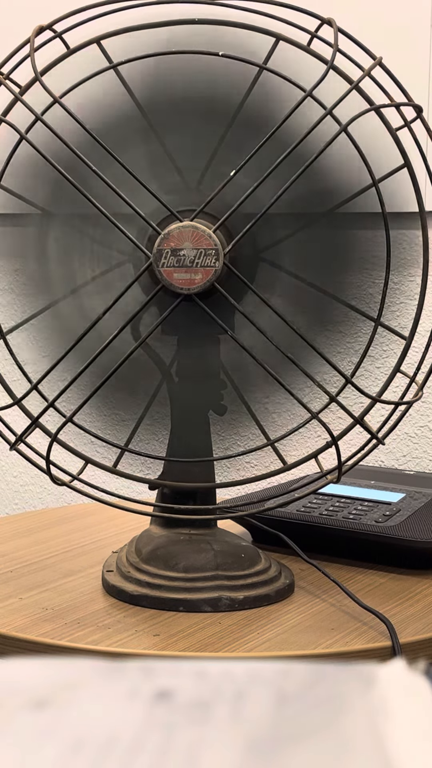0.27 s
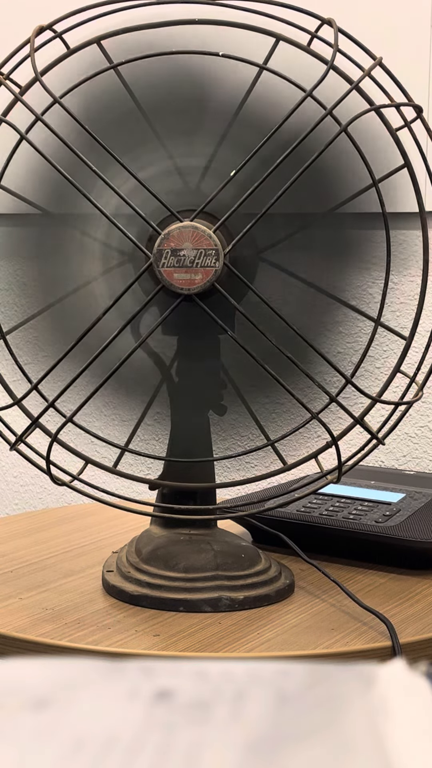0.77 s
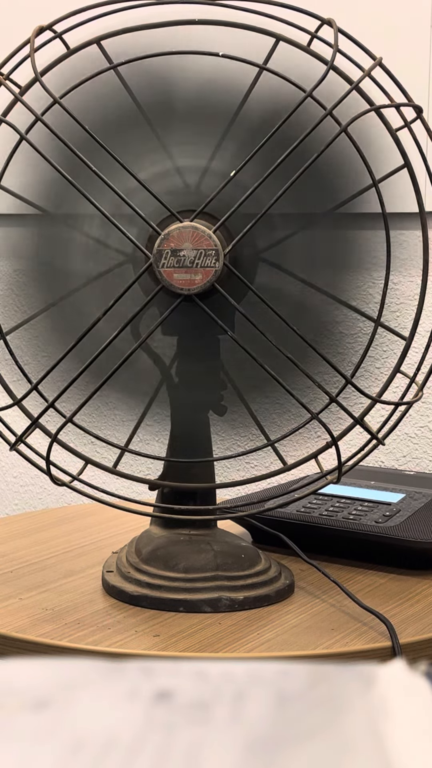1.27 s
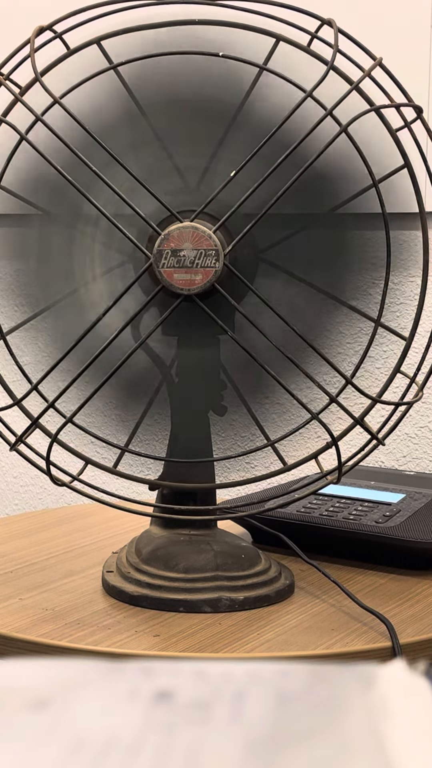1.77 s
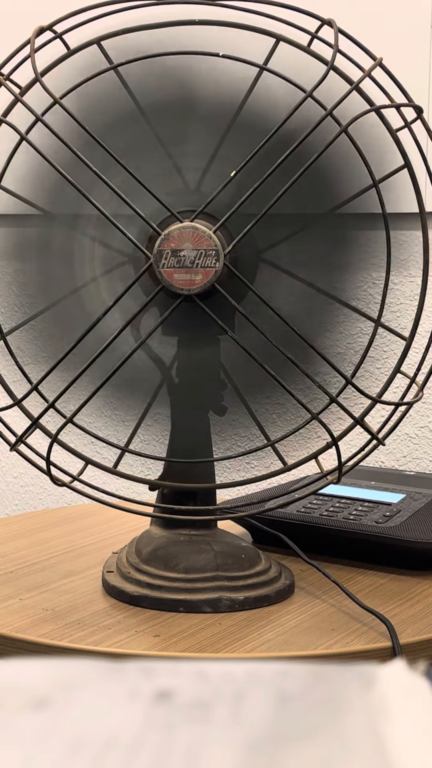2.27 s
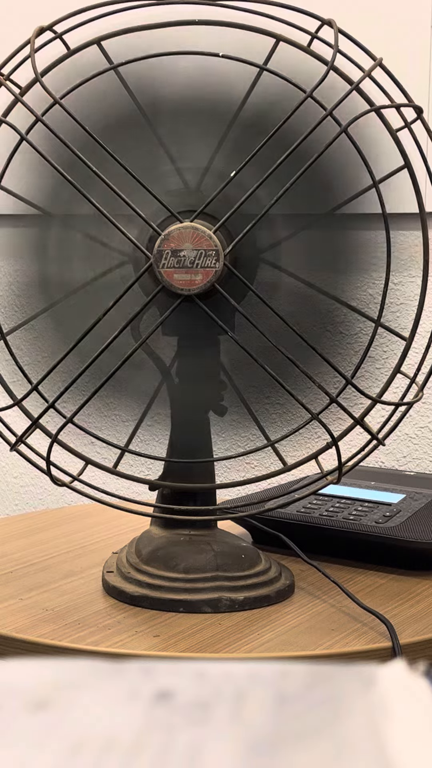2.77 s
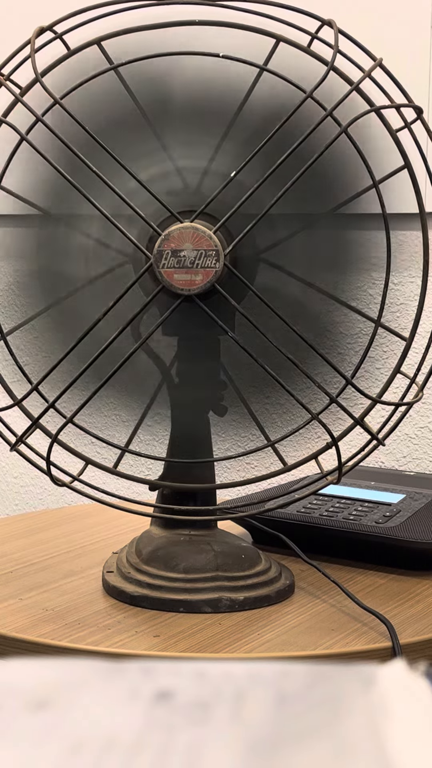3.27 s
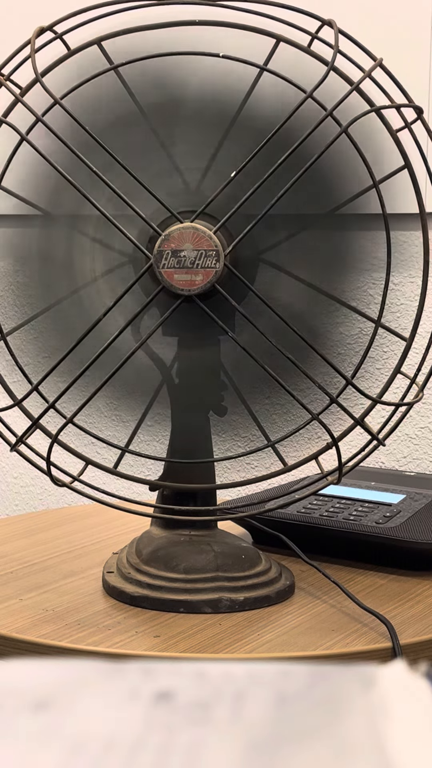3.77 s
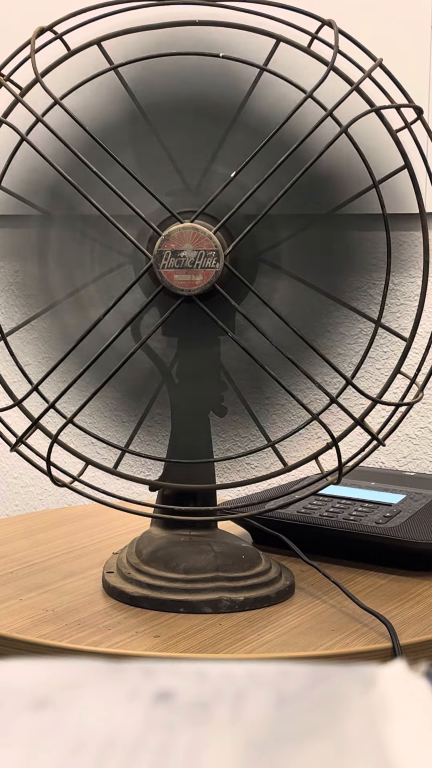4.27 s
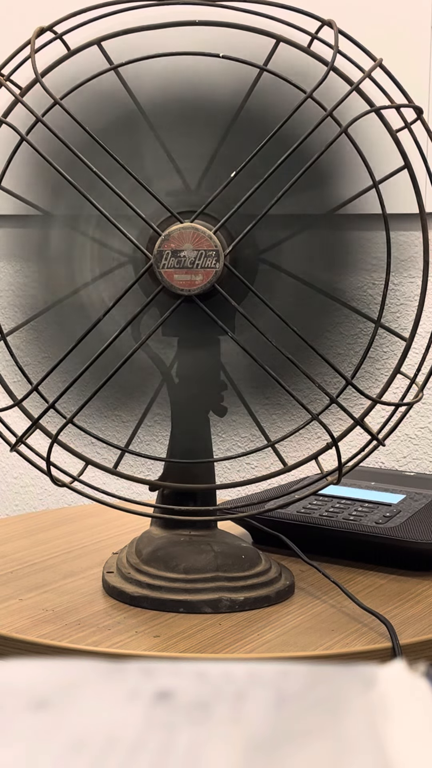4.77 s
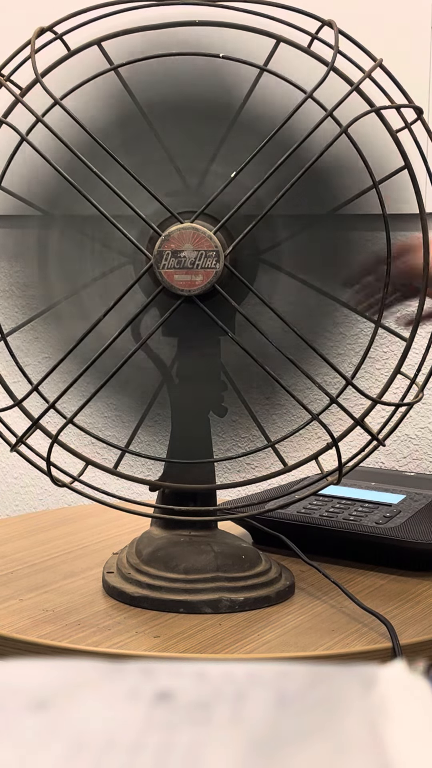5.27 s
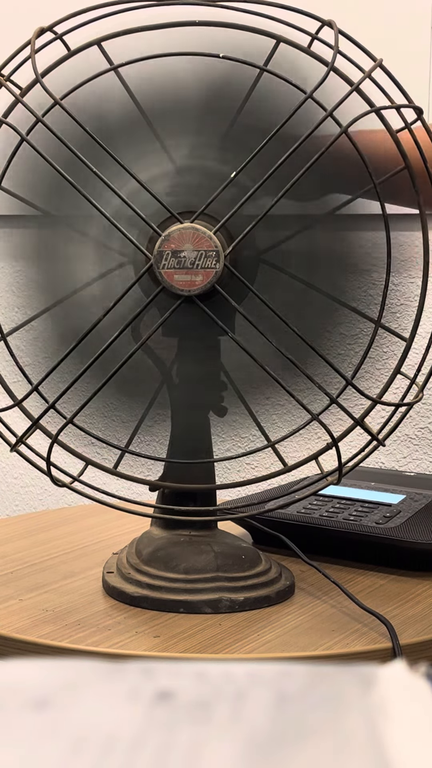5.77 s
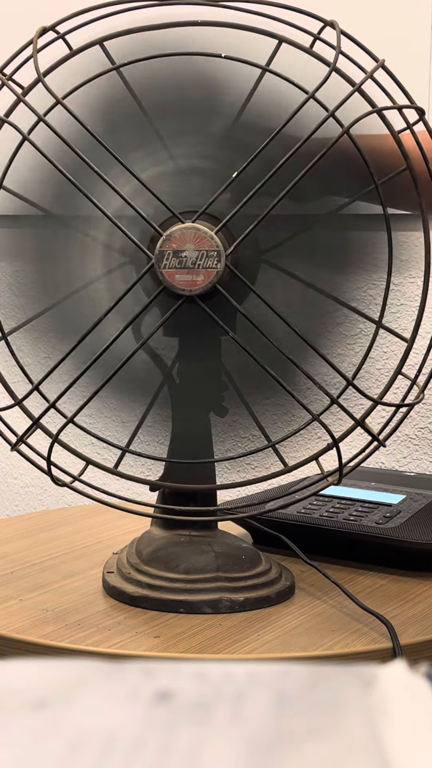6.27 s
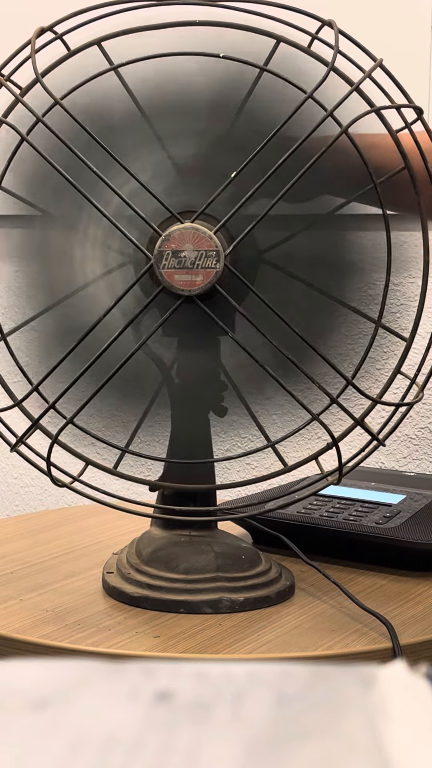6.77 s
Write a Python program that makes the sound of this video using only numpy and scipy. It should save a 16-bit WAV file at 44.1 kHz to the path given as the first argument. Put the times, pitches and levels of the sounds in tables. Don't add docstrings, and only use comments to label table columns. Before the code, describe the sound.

Close desk fan blowing straight into a microphone: gusty wind rumble, deep thuds, rapid flutters, even blade hiss, one tiny tick past the middle.

```python
import sys
import numpy as np
from scipy import signal
from scipy.fft import rfft, irfft, next_fast_len
from scipy.io import wavfile
from scipy.ndimage import uniform_filter1d

SR = 44100
rng = np.random.default_rng(int(sys.argv[2]) if len(sys.argv) > 2 else 0)


def wav_out(sig):
    wavfile.write(sys.argv[1], SR, np.round(np.clip(np.atleast_2d(sig).T, -1, 1) * 32767).astype(np.int16))


def field_ratio(decibels):
    return 10 ** (np.asarray(decibels, dtype=float) / 20)


N = 309582
TIME_S = np.arange(N) / SR
SIZE = next_fast_len(N)
HZ = np.maximum(np.arange(SIZE // 2 + 1) * SR / SIZE, 1)


def in_time(rows):
    s, *columns = np.transpose(rows)
    return [np.interp(TIME_S, s, c) for c in columns]


def at_hz(points, hz):
    point_hz, level_db = np.array(points).T
    return np.interp(np.log(hz), np.log(point_hz), level_db)


def rms_one(x):
    return x / np.sqrt(np.mean(x ** 2) + 1e-20)


def drift(rate_hz):
    r = np.exp(-20 * np.pi * rate_hz / SR)
    slow = signal.lfilter([1], [1, -2 * r, r * r], rng.standard_normal(N // 10 + 4002))[4000:]
    return np.interp(np.arange(N) / 10, np.arange(len(slow)), rms_one(slow))


def coloured(spectrum, excite=1):
    low_end = (spectrum[0][0] / 2, -80)
    high_end = (spectrum[-1][0] * 1.5, -90)
    gain = field_ratio(at_hz([low_end] + list(spectrum) + [high_end], HZ))
    white = excite * rng.standard_normal((2, N))
    return rms_one(irfft(rfft(white, SIZE) * gain, SIZE)[:, :N])


def evened(x, window_s, share):
    size = int(window_s * SR)
    power = uniform_filter1d(uniform_filter1d(x ** 2, size=size), size=size)
    return rms_one(x / (power + .02) ** (share / 2))


def puffs(rows, octaves, smooth=0.87):
    start_s, peak_db, pitch_hz, width_ms = np.transpose(rows)
    span = 3072
    half = span // 2
    t = (np.arange(span) - half) / SR
    f = np.maximum(np.arange(half + 1) * SR / span, 1)

    length_s = np.clip(width_ms[:, None, None] / 500, .002, .065)
    swell = np.cos(np.pi * np.clip(t / length_s, -.5, .5)) ** 2
    reach = np.where(f < pitch_hz[:, None], 2.18 * octaves, octaves)
    colour = np.exp(-.5 * (np.log2(f / pitch_hz[:, None]) / reach) ** 2)

    raw = rfft(rng.standard_normal((len(start_s), 2, span)) * swell)
    filled = raw / (np.abs(raw) + .3) ** np.clip(smooth, 0, 1)
    shaped = irfft(filled * colour[:, None], span) * np.sqrt(swell)
    shaped *= field_ratio(peak_db)[:, None, None] / np.abs(shaped).max(axis=2, keepdims=True)

    out = np.zeros((2, N + span))
    for at, puff in zip((start_s * SR).astype(int), shaped):
        out[:, at:at + span] += puff
    return out[:, half:N + half]


# time_s, level_db
STREAM_LEVEL = [(0, -28), (.5, -31), (.8, -28), (1.1, -29.5), (1.55, -24.5), (2.0, -28), (2.35, -26.5),
                (2.75, -26), (3.35, -25), (3.7, -25), (4.0, -23), (4.4, -26.5), (5.05, -23.5), (5.4, -26),
                (5.8, -26), (6.25, -27), (6.6, -27), (7.02, -26)]
# centre_s, over_stream_db, half_width_ms
STREAM_SWINGS = [(.37, -6.5, 21), (.45, 5.5, 54), (.94, -12, 20), (1.17, -2, 30), (1.27, 4.5, 19),
                 (1.35, -11, 38), (1.43, 8, 21), (2.45, -5.5, 42), (2.54, 6, 21), (2.96, -7.5, 46),
                 (3.032, 6, 33), (3.14, -5, 33), (3.225, 10, 28), (3.7, -10, 27), (3.87, -12.5, 60),
                 (4.13, -6, 71), (4.18, 11, 7.5), (4.57, -14, 21), (4.63, 8.5, 12), (4.69, -8, 42),
                 (4.79, 1.5, 45), (4.89, -4, 33), (4.94, 7.5, 15), (5.201, -20.5, 17), (5.648, 9, 20),
                 (6.15, -15.5, 22), (6.35, -6, 20), (6.41, 6.5, 17), (6.671, -3, 8.3), (6.78, -6, 6.7),
                 (0.0, 9.5, 75), (.135, 5, 22), (.7, -5, 19), (.735, 2, 15), (1.8, 0, 16), (1.97, 7, 14),
                 (2.08, 3.5, 18), (2.22, -2, 47), (2.34, -5.5, 17), (2.47, 6.5, 15), (2.845, 3.5, 12),
                 (2.9, -2.5, 9), (3.32, -6.5, 42), (4.05, -4.5, 17), (4.13, -9, 20), (4.26, -8, 11),
                 (4.9, -1.5, 36), (5.35, -8, 14), (5.45, -2, 20), (5.6, 6, 20), (5.7, -1.5, 15),
                 (5.87, 6.5, 27), (5.98, -2, 19), (6.199, 9, 11), (6.27, 7, 20), (6.48, -4.5, 20),
                 (6.62, 3.5, 16), (6.71, -6.5, 14), (4.64, 2, 25), (1.5, 1, 23)]


def stream_levels():
    outset_db, outset_fade_s = -5.0, 0.087
    upper_follows, upper_lead_s = 0.33, 0.036
    stream_db = in_time(STREAM_LEVEL)[0] + outset_db * np.exp(-TIME_S / outset_fade_s)
    coarse_s = np.arange(0, N / SR, .002)
    centre_s, over_db, half_width_ms = np.transpose(STREAM_SWINGS)[:, :, None]
    swing_db = np.sum(over_db * np.exp(-.5 * ((coarse_s - centre_s) / half_width_ms * 1000) ** 2), axis=0)
    deep_db = stream_db + np.interp(TIME_S, coarse_s, swing_db)
    upper_db = stream_db + upper_follows * np.interp(TIME_S + upper_lead_s, coarse_s, swing_db)
    return deep_db, upper_db


# pitch_hz, density_db
DEEP_SPECTRUM = [(20, -41), (35, -15), (58, 1), (85, -3), (110, -9.5), (160, -35.5)]
# pitch_hz, density_db
UPPER_SPECTRUM = [(60, -26.5), (95, -3), (130, -2), (200, -9.5), (300, -12), (450, -25)]


def rumble(deep_db, upper_db):
    deep = evened(coloured(DEEP_SPECTRUM), window_s=0.13, share=1.0)
    upper = evened(coloured(UPPER_SPECTRUM), window_s=0.022, share=0.8)
    deep_gain = field_ratio(deep_db + 0.6 + 2.1 * drift(23))
    upper_gain = field_ratio(upper_db - 8 + 1.34 * drift(13.0))
    return deep_gain * deep + upper_gain * upper


# pitch_hz, density_db
FLUTTER_SPECTRUM = [(200, 1.5), (320, 4), (550, 3.5), (1000, -5), (1400, -19.5), (2200, -17)]


def flutter(upper_db):
    flutter_db, follows = -43.5, .4
    clumps = field_ratio(np.minimum(2.3 * drift(35) + 4.7 * drift(150), 6))
    return field_ratio(flutter_db + follows * (upper_db + 28.5)) * coloured(FLUTTER_SPECTRUM, clumps)


def buffeting():
    deep_db, upper_db = stream_levels()
    return rumble(deep_db, upper_db) + flutter(upper_db)


# start_s, peak_db, pitch_hz, width_ms
LARGE_EDDIES = [(0.7233, -17.5, 130, 6.5), (1.3921, -20, 142, 7.9), (1.6185, -17, 144, 6.7),
                (1.9109, -21.5, 117, 16), (2.4705, -11.5, 172, 4.9), (2.6838, -17, 128, 49),
                (3.0075, -14.5, 175, 24), (3.205, -13, 203, 21), (3.5907, -20, 121, 39),
                (3.7788, -14, 153, 16), (4.1838, -23, 129, 39), (4.2628, -17.5, 145, 32),
                (4.6305, -16.5, 150, 6), (4.7886, -6.5, 143, 7.9), (4.9214, -14.5, 124, 37),
                (4.981, -17, 151, 5.8), (5.0137, -20.5, 127, 19), (5.0951, -15.5, 131, 13),
                (5.2625, -15, 159, 14), (5.4019, -10, 177, 2.16), (5.5051, -23, 151, 7.6),
                (5.607, -10.5, 137, 19), (5.7638, -15.5, 148, 19), (5.8544, -23, 174, 10),
                (6.0724, -18, 182, 3.2), (6.1557, -18, 159, 17), (6.3017, -15, 120, 38),
                (6.3968, -16.5, 148, 34), (6.5421, -21, 132, 23), (6.7719, -16.5, 194, 22)]
# start_s, peak_db, pitch_hz
FURTHER_THUMPS = [(0.0898, -28.5, 140), (0.1833, -19, 140), (0.2481, -22.5, 150), (0.2934, -26.5, 150),
                  (0.4066, -21.5, 159), (0.5349, -16, 117), (0.8001, -25, 150), (0.86, -14.5, 130),
                  (1.0446, -23, 190), (1.4111, -28, 138), (1.4928, -23.5, 177), (1.5556, -26, 150),
                  (1.7006, -17.5, 170), (1.7858, -22.5, 182), (1.8171, -20.5, 150), (1.853, -19.0, 150),
                  (2.1146, -23.0, 170), (2.1396, -16, 159), (2.3548, -20, 190), (2.5225, -14, 140),
                  (2.5501, -22, 150), (2.5857, -17.5, 169), (2.7415, -28, 140), (2.7745, -26.5, 160),
                  (3.0772, -23.5, 142), (3.4485, -25, 150), (3.5242, -23.5, 130), (3.6728, -23.5, 170),
                  (3.7387, -17, 130), (3.7592, -19, 177), (3.9767, -22.5, 190), (4.0591, -15.5, 130),
                  (4.1174, -20.5, 204), (4.2794, -18, 140), (4.3045, -27, 128), (4.3244, -21, 140),
                  (4.3521, -21, 141), (4.4972, -18.5, 140), (4.5281, -18.5, 130), (4.7236, -24.5, 180),
                  (4.7443, -23, 130), (4.8127, -22.5, 164), (4.8809, -21, 150), (4.9076, -16.0, 160),
                  (5.0368, -20.0, 222), (5.2379, -19, 155), (5.3105, -20, 150), (5.6522, -27, 127),
                  (5.7098, -21, 220), (5.7931, -21, 201), (5.8318, -22, 150), (5.9482, -20, 150),
                  (6.0055, -15.5, 151), (6.0387, -28.5, 150), (6.1881, -24.5, 176), (6.3495, -27, 142),
                  (6.5662, -22.0, 150), (6.6019, -22.5, 190), (6.6649, -18, 177), (7.0066, -18.5, 148)]


def eddies():
    further_thump_ms = 11.1
    further_thumps = np.c_[FURTHER_THUMPS, np.full(len(FURTHER_THUMPS), further_thump_ms)]
    large = np.r_[LARGE_EDDIES, further_thumps]
    snaps = small_eddies()
    snap_octaves = np.clip(0.45 + 0.02 * (snaps[:, 1:2] + 25), .3, 1.2)
    pushes = snaps * [1, 0.78, 0.46, 1.9]
    thump_sound = field_ratio(-2.0) * puffs(large, octaves=0.44)
    snap_sound = field_ratio(-1.57) * puffs(snaps, snap_octaves)
    push_sound = field_ratio(-7.5) * puffs(pushes, octaves=0.74)
    return thump_sound + snap_sound + push_sound


# start_s, peak_db, pitch_hz, width_ms
STRONG_EDDIES = [(.386, -17, 715, 2), (.4599, -21, 714, 7.6), (.6272, -19.5, 690, 4.1),
                 (.7934, -14, 765, 4.4), (.831, -16.5, 620, 3.3), (.8406, -20.5, 696, 2.9),
                 (1.1246, -19, 580, 6), (1.454, -18, 810, 4.4), (1.4897, -23, 740, 1.8),
                 (1.8764, -19.5, 580, 4.1), (2.1476, -11.5, 600, 3.7), (2.6897, -17.5, 695, 2),
                 (2.996, -14, 835, 3.6), (3.7312, -19.5, 626, 3.9), (4.1847, -15.5, 566, 2.6),
                 (4.5076, -19.5, 587, 3.6), (4.697, -14, 756, 2.26), (4.7201, -18, 735, 2.1),
                 (5.0334, -17.5, 810, 5.6), (5.0574, -19.5, 640, 0.93), (5.2815, -20, 706, 3.3),
                 (5.3995, -13, 736, 2.7), (5.5739, -14.5, 880, 6.6), (5.7059, -16, 537, 4.4),
                 (5.8521, -15.5, 600, 9.3), (6.0689, -15, 640, 5), (6.2584, -15.5, 900, 1.8),
                 (6.5347, -16, 587, 4.5), (6.5969, -15.5, 780, 0.92), (6.905, -16.5, 570, 1.9)]
# start_s, peak_db, pitch_hz
STRAY_EDDIES = [(.1497, -22, 700), (.1801, -23.5, 676), (.2313, -25, 553), (.6793, -26, 740),
                (1.0655, -25.5, 920), (1.108, -22.5, 790), (1.288, -28, 706), (1.3818, -21.5, 610),
                (1.632, -22.5, 860), (1.9375, -22, 690), (2.4202, -26.5, 650), (2.5305, -26, 775),
                (2.8601, -24.5, 650), (2.959, -19, 686), (3.6353, -17.5, 606), (3.7003, -23.5, 684),
                (4.2489, -22.5, 1170), (4.6387, -19.5, 606), (4.9337, -22, 770), (4.9594, -20.5, 710),
                (5.3405, -20, 554), (5.4441, -21, 690), (5.4959, -18.5, 536), (5.8085, -27, 654),
                (5.9991, -21, 580), (6.0287, -20.5, 885), (6.146, -20, 990), (6.6707, -20, 685),
                (6.7756, -21.5, 696), (7.001, -22.5, 730)]
# start_s, peak_db, pitch_hz
FURTHER_EDDIES_FIRST = [(0.0088, -26, 725), (0.0166, -26.5, 610), (0.0313, -30.5, 600), (0.0804, -20.5, 670),
                        (0.0878, -31, 520), (0.287, -28, 630), (0.2957, -23.5, 805), (0.3084, -26, 593),
                        (0.374, -24.0, 680), (0.399, -28, 720), (0.406, -20.5, 755), (0.448, -23.5, 884),
                        (0.4666, -29, 650), (0.474, -27, 750), (0.5727, -28.5, 640), (0.5852, -26, 700),
                        (0.7372, -27, 930), (0.7437, -28.0, 680), (0.7555, -29, 650), (0.7666, -29, 610),
                        (0.7797, -25.5, 710), (1.021, -22, 720), (1.0364, -21, 700), (1.2024, -20, 630),
                        (1.217, -24.5, 690), (1.4723, -23.5, 644), (1.5987, -22, 560), (1.6103, -20.5, 704),
                        (1.6651, -23.5, 684), (1.6978, -32, 550), (1.7202, -26.0, 585), (1.7688, -21, 560),
                        (1.7838, -25.5, 700), (1.7986, -32.5, 735), (1.8228, -30.5, 676), (1.832, -21, 710),
                        (1.856, -25.5, 750), (1.9065, -24.5, 970), (1.9132, -25, 760), (1.977, -25, 676),
                        (2.0004, -27.5, 830), (2.076, -27.0, 570), (2.106, -26.5, 650), (2.1306, -27.0, 620),
                        (2.2451, -27, 810), (2.2576, -28, 660), (2.3155, -26.5, 830), (2.4664, -21, 566),
                        (2.5765, -29, 760), (2.6035, -27.0, 660), (2.6103, -28.5, 670), (2.703, -21, 600),
                        (3.0025, -30, 680), (3.194, -25, 676), (3.2148, -18.5, 640), (3.227, -26, 544),
                        (3.4201, -28.5, 680), (3.49, -26.5, 690), (3.5033, -28, 647), (3.5604, -29, 680)]
# start_s, peak_db, pitch_hz
FURTHER_EDDIES_SECOND = [(3.5732, -25, 650), (3.7683, -25, 644), (3.8058, -26, 610), (3.9221, -28, 580),
                         (4.0239, -29.5, 720), (4.0804, -23, 670), (4.1151, -21.5, 606), (4.1236, -25.0, 780),
                         (4.1329, -19.5, 550), (4.1708, -29, 800), (4.2617, -31, 730), (4.3024, -24.5, 770),
                         (4.3093, -31, 640), (4.3557, -28.5, 800), (4.458, -19, 530), (4.4909, -20, 650),
                         (4.6134, -19, 630), (4.6698, -26.5, 590), (4.6781, -21, 630), (4.7698, -24.0, 630),
                         (4.7806, -29, 660), (4.799, -27, 554), (4.8378, -20.5, 700), (4.8515, -19.5, 537),
                         (4.8847, -26, 690), (4.9849, -28.5, 610), (4.9996, -25, 620), (5.0092, -28.5, 850),
                         (5.0171, -26.5, 610), (5.048, -23, 536), (5.0732, -18.5, 640), (5.3788, -21.5, 573),
                         (5.3913, -18, 570), (5.4073, -24.0, 660), (5.5515, -26, 730), (5.5662, -19.5, 700),
                         (5.582, -20, 780), (5.593, -15.5, 640), (5.6021, -15.5, 700), (5.638, -26, 730),
                         (5.6484, -24.5, 760), (5.654, -24, 650), (5.6624, -30, 626), (5.6701, -20.5, 640),
                         (5.6907, -24.5, 650), (5.74, -23.5, 620), (5.786, -28, 760), (5.8173, -19, 670),
                         (5.8268, -34, 680), (6.061, -17, 736), (6.264, -22, 770), (6.373, -25.5, 720),
                         (6.385, -24.5, 680), (6.431, -27, 700), (6.4515, -23.5, 740), (6.522, -23, 860),
                         (6.6483, -23.5, 860), (6.8024, -27.5, 800), (6.8905, -27, 774), (6.9256, -31.5, 560)]


def small_eddies():
    usual_ms, log_spread = 3.74, 0.33
    weak = np.r_[STRAY_EDDIES, FURTHER_EDDIES_FIRST, FURTHER_EDDIES_SECOND]
    width_ms = usual_ms * np.exp(log_spread * rng.standard_normal(len(weak)))
    return np.r_[STRONG_EDDIES, np.c_[weak, width_ms]]


# start_s, peak_db, pitch_hz, width_ms
TICK_PARTS = [
    (4.636, -63, 14000, 1.7),
    (4.6474, -42, 13500, 1.4),
    (4.6478, -41, 5600, 2.0),
    (4.6514, -46, 4600, 1.6),
]


def tick():
    aside_db = 40
    return puffs(TICK_PARTS, octaves=.45) * field_ratio([[0], [aside_db]])


# time_s, level_db
BLADE_LEVEL = [(0, -54), (4.4, -52.5), (5.6, -52), (7.02, -52)]
# pitch_hz, density_db
BLADE_SPECTRUM = [(150, -8), (400, -4.5), (900, -3.5), (1500, -3), (2200, -3.5), (3000, -9), (3900, -18),
                  (5000, -19.5), (8000, -26), (12000, -33.5), (15000, -39), (15700, -43), (16200, -78)]


def blades():
    level_db, = in_time(BLADE_LEVEL)
    return field_ratio(level_db + 7.0) * coloured(BLADE_SPECTRUM)


def scene():
    return buffeting() + eddies() + tick() + blades()


def roll_off(x):
    return signal.sosfilt(signal.butter(12, 15750, fs=SR, output="sos"), x)


# pitch_hz, lead_rad
PORT_LEAD = [(290, 0.0), (400, 1.8), (500, -.5), (620, -.85), (1000, -.5), (1600, -.35), (2100, .95),
             (2600, 2.25), (3800, .85), (4600, 1.45), (5000, 1.3), (5950, 3.14), (16000, 17.75)]
# pitch_hz, share_db
PORT_UNLIKE = [(150, -80), (185, -51), (225, -26), (280, -46.5), (370, -8.5), (450, -4.5), (560, -15),
               (1300, -8.5), (2000, -14.5), (4500, -42), (8000, -43.5)]


def record(dry):
    common, other = rfft(dry, SIZE)
    unlike = np.clip(field_ratio(at_hz(PORT_UNLIKE, HZ)), 0, 1)
    alike = np.sqrt(1 - unlike ** 2)
    sign = np.array([[1], [-1]])
    turn = np.exp(.5j * sign * np.interp(HZ, *np.transpose(PORT_LEAD)))
    ports = irfft(turn * (alike * common + sign * unlike * other), SIZE)[:, :N]
    return roll_off(ports)


dry = scene()
out = record(dry)
wav_out(out)
```